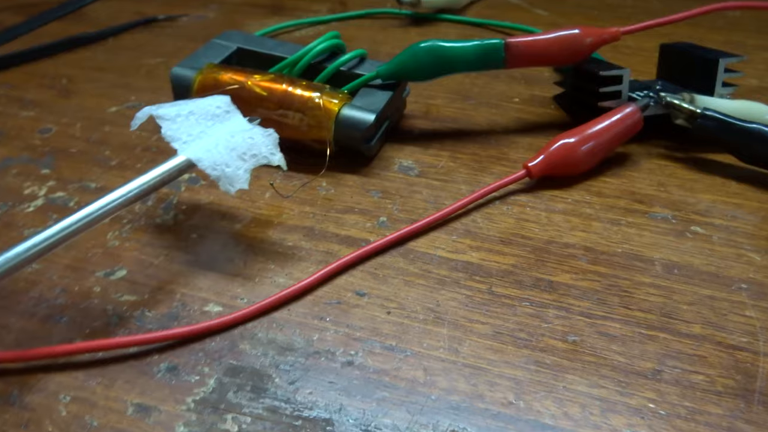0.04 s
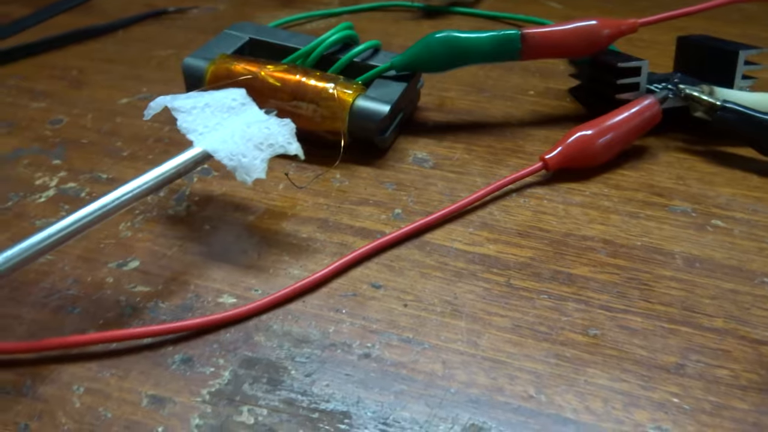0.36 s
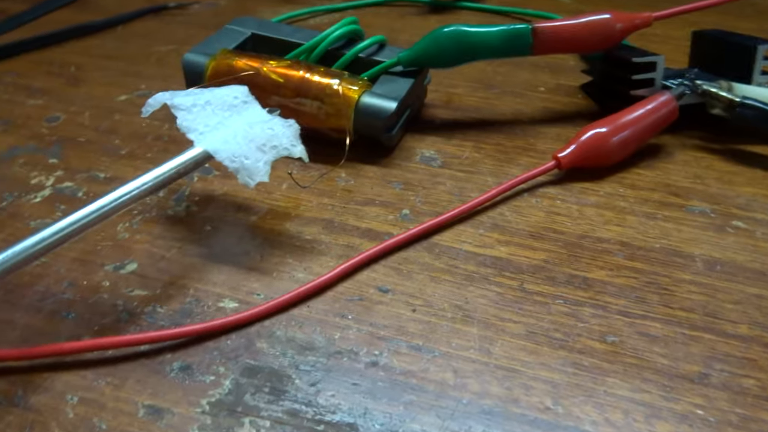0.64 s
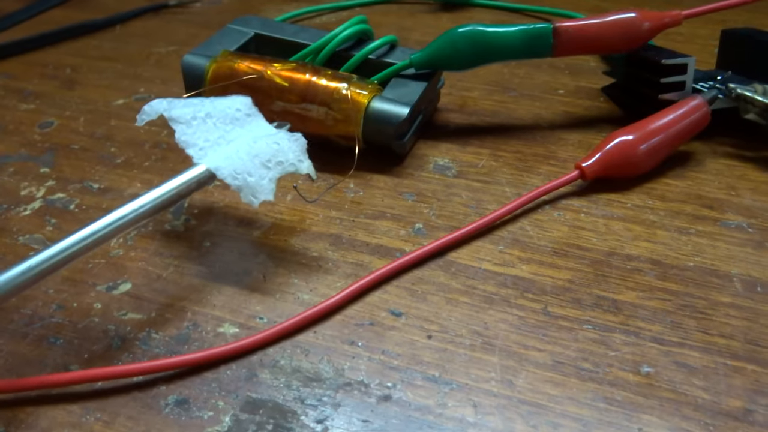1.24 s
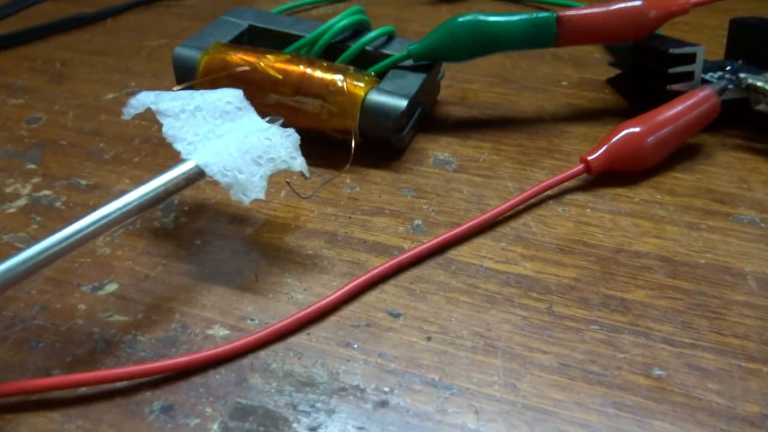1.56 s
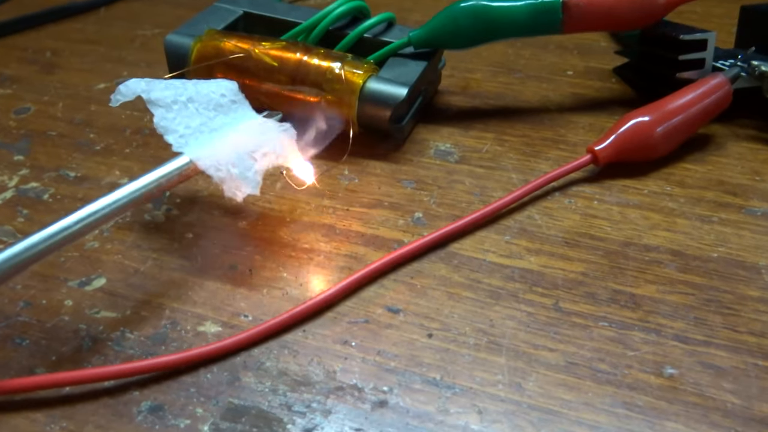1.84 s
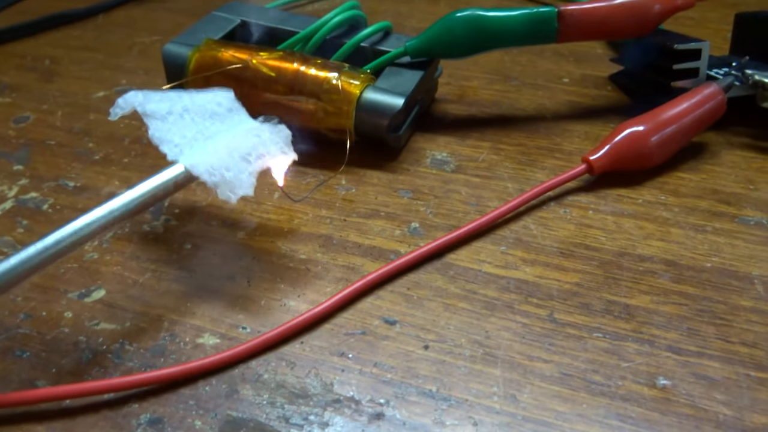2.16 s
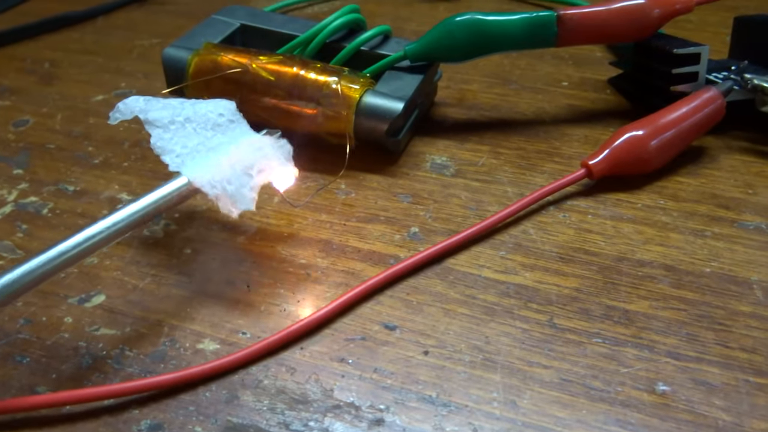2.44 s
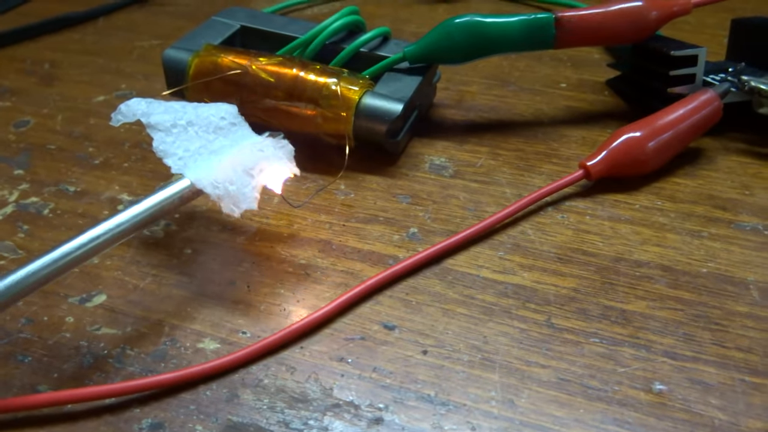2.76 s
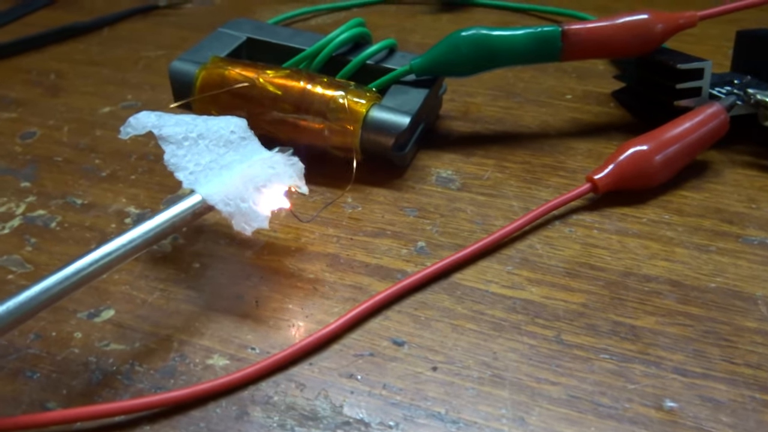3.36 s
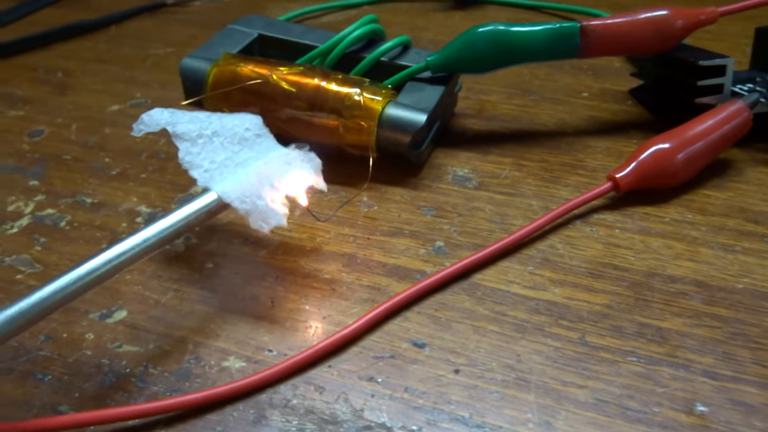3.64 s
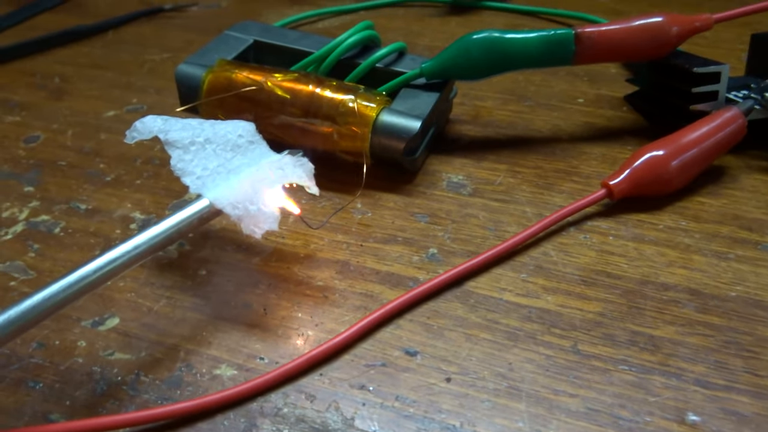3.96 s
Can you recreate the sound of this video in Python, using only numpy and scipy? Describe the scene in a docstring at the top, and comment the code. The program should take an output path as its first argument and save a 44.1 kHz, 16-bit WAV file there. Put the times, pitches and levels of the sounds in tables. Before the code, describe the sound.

A small high-voltage transformer whines steadily close to the microphone, ticking faintly over a room fan's hum. An electric arc strikes with a double crack, then hisses and sizzles in bursts on burning paper while the whine wavers.

```python
"""A small high-voltage transformer on a wooden table, close to the microphone, in a room with a fan.
At first the core whines over the fan's hum; its drive slips with a faint tick several times a second.
At 1.65 s an arc strikes with a double crack, loads the core and changes the whine.
From then on the arc hisses on a burning paper wad, and from 2.1 s it sizzles in bursts."""
import sys
import numpy as np
from scipy.fft import rfft, irfft, next_fast_len
from scipy.io import wavfile
from scipy.ndimage import map_coordinates

SR = 44100
rng = np.random.default_rng(int(sys.argv[2]) if len(sys.argv) > 2 else 0)


def wrap_up_sound(samples):
    """Save the sound to the file named by the first command line argument, as 16-bit audio."""
    columns = np.atleast_2d(samples).T
    # keep every value between -1 and 1, then stretch to whole-number steps
    tamed = np.clip(columns, -1, 1)
    steps = np.round(tamed * 32767).astype(np.int16)
    wavfile.write(sys.argv[1], SR, steps)


N = 176400
T = np.arange(N) / SR

DRIVE_HZ, SWITCHES, CORE_RESONANCE_HZ = 243.68, 4, 6700
SLIP_START_S, SLIP_EVERY_S, SLIP_LENGTH_S = 0.1873, 0.1303, 0.0023
SLIP_RAD, SLIP_SPREAD_RAD, SLIP_BAND_HZ, SLIP_WIDTH_HZ = 2.3, 0.19, 7590, 283
STRIKE_S, CHANGEOVER_S, WARM_UP_S = 1.652, 0.011, 0.65

# The core's whine, idle and feeding the arc. Each row: multiple of the drive rate, base level in dB.
IDLE_PARTIALS = [(8, -60), (12, -54), (16, -55), (20, -56), (24, -55), (25, -63), (27, -64), (28, -51.5),
                 (29, -54), (30, -51), (31, -42.5), (32, -38), (33, -48.5), (34, -58), (35, -59), (36, -42),
                 (37, -43), (39, -56), (40, -41.5), (41, -56), (42, -61), (43, -56), (44, -45), (45, -47.5),
                 (48, -57), (49, -58), (57, -65), (60, -66), (61, -64)]
LOADED_PARTIALS = [(11, -61), (13, -57), (15, -54.5), (16, -62), (17, -63), (19, -63), (20, -56.5),
                   (25, -56), (27, -62), (28, -59), (29, -63), (31, -49.5), (32, -49), (33, -50), (35, -60),
                   (36, -46.5), (37, -50), (39, -54), (40, -47), (41, -39.5), (42, -53), (43, -48.5),
                   (44, -44.5), (45, -44), (46, -57), (47, -60), (48, -52), (49, -49.5), (50, -62),
                   (51, -61), (53, -58), (55, -62), (56, -55.5), (60, -63), (61, -59), (64, -60)]
# Partials that settle as the circuit warms. Each row: multiple of the drive rate, starting offset in dB.
COLD_OFFSETS = [(20, 4), (29, 6), (30, 4), (31, -9), (33, -13), (36, -6), (37, -6), (39, 7), (44, -5),
                (45, -6)]
# The arc's load on the core. Each row: time in seconds, shift of the whine in dB.
ARC_LOAD = [(1.68, -4.5), (1.76, -6.5), (1.87, -4), (1.93, -1.5), (2.0, -1.5), (2.1, 2), (2.14, 0),
            (2.21, 6), (2.26, 2.5), (2.35, 1.5), (2.39, 0), (2.43, 2), (2.53, -5.5), (2.63, 1),
            (2.72, -1.5), (2.87, -1), (2.93, -7.5), (3.03, -5), (3.09, -2.5), (3.29, -3), (3.33, 1),
            (3.48, 1), (3.6, 4), (3.7, 2.5), (3.78, 5), (3.87, 3.5), (4.0, 6)]
# Multiples of the drive rate that barely follow the load, and those that whistle up together.
STIFF_MULTIPLES = (31, 33, 35, 37, 45)
WHISTLING_MULTIPLES = (20, 25, 28, 40, 48)
# The swell of that whistle. Each row: time in seconds, shift in dB.
WHISTLE_SWELL = [(1.8, -10), (1.95, 1), (2.1, 6), (2.22, 3), (2.52, -8), (2.65, 1.5), (2.75, -5), (3.1, -9),
                 (3.6, -0.5), (4.0, 1.5)]
# The arc's cracks and sizzling bursts. Each row: start in seconds, hold in seconds, level in dB.
ARC_CRACKS = [(1.6522, .006, -32.5), (1.669, 0.003, -33.5), (1.779, .005, -40.5)]
SIZZLE_BURSTS = [(2.119, .16, -41), (2.123, 0.03, -38.5), (2.526, 0.0072, -42), (2.553, .008, -42),
                 (2.591, 0.1, -39), (2.645, 0.026, -39), (2.787, 0.014, -47), (3.09, .006, -48),
                 (3.555, 0.03, -42.5), (3.81, .012, -46), (3.942, 0.012, -43)]
# The paper burning in the arc. Each row: time in seconds, hiss level in dB, flame level in dB.
BURN_LEVELS = [(1.66, -47, -50), (1.85, -45, -63), (2.03, -41.5, -57), (2.1, -43, -54), (2.19, -37, -51),
               (2.27, -37.5, -50), (2.32, -45.5, -55), (2.55, -48, -54), (2.655, -34.5, -49),
               (2.71, -43, -55), (3.0, -44, -52), (3.27, -47.5, -56), (3.38, -41.5, -45), (3.5, -44, -55.5),
               (3.6, -44, -53), (3.78, -49, -60), (3.93, -41.5, -44.5), (4.0, -49, -55)]
# Each noise as it reaches the microphone. Each row: frequency in Hz, relative density in dB.
CRACK_SPECTRUM = [(200, -5), (700, 0), (3000, 3.5), (5000, -8.5), (7000, 0.5), (11300, 3), (13000, -13)]
HISS_SPECTRUM = [(300, -14), (1500, -3.5), (3000, -1.5), (4500, -13.5), (6300, -16.5), (7800, -1.5),
                 (9000, 1.5), (10300, 6), (11500, 2), (13000, -11), (16000, -7)]
FLAME_SPECTRUM = [(60, -26), (200, 12.5), (450, 9), (750, 11), (1200, -8.5), (1800, -10), (4000, -34),
                  (10000, -46)]
SIZZLE_SPECTRUM = [(150, -10), (450, -4), (800, 1), (1600, -1.5), (2400, 4), (3300, 1), (4500, -10.5),
                   (6500, -4.5), (8800, -26), (10600, 8), (11600, 2), (13000, -19), (16000, -36)]
TICK_SPECTRUM = [(3000, -14), (7400, -10), (10500, -1), (13000, -24)]
AIR_SPECTRUM = [(25, -45), (60, -21), (160, -9.5), (220, -4), (280, -1.5), (340, -5.5), (430, -15),
                (700, -16.5), (900, -22.5), (1100, -16.5), (1700, -25), (2800, -24), (3700, -37),
                (12000, -27.5), (16000, -50)]
# Fan and mains hum in the room. Each row: frequency in Hz, level in dB.
HUM_TONES = [(49.5, -67.5), (120, -65), (130, -61.5), (270.5, -50), (294, -49), (391, -61.5), (915, -67.5),
             (1044, -60.5), (1174, -64.5), (1549, -65), (1707, -69)]
# Stereo width of the noises. Each row: frequency in Hz, side against mid in dB.
STEREO_WIDTH = [(50, -23), (270, -27.5), (600, -14), (1200, -9), (2000, -22.5), (6000, -58), (12000, -4)]
# Balance at the microphone. Each row: frequency in Hz, left minus right in dB.
STEREO_BALANCE = [(200, 0), (700, -1), (1500, -1.3), (2600, .2), (7000, -.6)]


def transformer():
    """Close up, the core settles into a steady whine, then follows the unsteady load of the arc."""
    cold = np.exp(-(T / WARM_UP_S) ** 2)
    load_db, = curves(ARC_LOAD)
    whistle_db, = curves(WHISTLE_SWELL)

    def cold_shift(k):
        return dict(COLD_OFFSETS).get(k, 0) * cold

    def load_shift(k):
        if k in WHISTLING_MULTIPLES:
            return whistle_db
        stiff = k in STIFF_MULTIPLES or k * DRIVE_HZ < CORE_RESONANCE_HZ
        return 0.18 * load_db if stiff else load_db

    idle = whine(IDLE_PARTIALS, cold_shift, weak_db=-71, drift_db=0.8, scatter_rad=1.15)
    loaded = whine(LOADED_PARTIALS, load_shift, weak_db=-67.5, drift_db=1.8, scatter_rad=1.68)
    flutter = amp(-1 + 0.7 * wobble(40))
    struck = np.clip((T - STRIKE_S) / CHANGEOVER_S, 0, 1)
    return (1 - struck) * idle + struck * flutter * loaded


def whine(partials, shift_db, weak_db, drift_db, scatter_rad):
    """The core sings at harmonics of the drive; each slip jumps their phases, most of all in one band."""
    count, since = np.divmod(T - SLIP_START_S + SLIP_EVERY_S, SLIP_EVERY_S)
    slips = count + np.clip(since / SLIP_LENGTH_S, 0, 1)
    ring, levels = ring_phases(partials), dict(partials)
    out = np.zeros((2, N))
    for k in range(min(levels), max(levels) + 1):
        hz = k * DRIVE_HZ
        scatter, lean = rng.standard_normal(2)
        jumps = SLIP_SPREAD_RAD * np.interp(slips, np.arange(40), rng.standard_normal(40))
        in_band = np.exp(-((hz - SLIP_BAND_HZ) / SLIP_WIDTH_HZ) ** 4)
        step = SLIP_RAD * in_band if k % SWITCHES else 0
        phase = 2 * np.pi * hz * T + ring[k] + scatter_rad * scatter + step * slips + jumps
        level = amp(levels.get(k, weak_db) + shift_db(k) + drift_db * wobble(9))
        side = amp(-18) * np.sign(lean) * np.sin(phase)
        out += np.sqrt(2) * level * (np.cos(phase) + np.outer([1, -1], side))
    return out


def ring_phases(partials):
    """A phase for each harmonic such that every cycle starts sharply and rings out (minimum phase)."""
    multiple, db = np.transpose(partials)
    levels = np.full(73, db.min())
    levels[np.round(multiple).astype(int)] = db
    cepstrum = irfft(np.log(amp(levels)))
    return 2 * rfft(cepstrum[:len(levels) - 1], len(cepstrum)).imag


def arc():
    """The arc cracks as it strikes and sputters, hisses and sizzles on the paper, and feeds a flame."""
    hiss_db, flame_db = curves(BURN_LEVELS)
    crack = discharges(ARC_CRACKS, release_s=0.0076) * noise(CRACK_SPECTRUM, amp(2.2 * wobble(900)))
    hiss = amp(hiss_db + 1.4 * wobble(45)) * noise(HISS_SPECTRUM, sparks(pulse_db=4.5, grain_db=1.5))
    flame = amp(flame_db + 2.0 * wobble(22.11)) * noise(FLAME_SPECTRUM)
    sizzle_level = discharges(SIZZLE_BURSTS, release_s=0.0099) * amp(0.8 * wobble(60))
    sizzle = sizzle_level * noise(SIZZLE_SPECTRUM, sparks(pulse_db=1.5, grain_db=-0.5))
    return crack + sizzle + (T > STRIKE_S) * (hiss + flame)


def discharges(rows, release_s, attack_s=0.0006):
    """Envelope of a run of discharges: each rises fast, holds and dies away."""
    power = np.zeros(N)
    for start, hold, db in rows:
        rise = np.clip((T - start) / attack_s, 0, 1)
        fall = np.exp(-np.maximum(T - start - hold, 0) / release_s)
        power += (amp(db) * rise * fall) ** 2
    return np.sqrt(power)


def sparks(pulse_db, grain_db):
    """The discharge swells once a drive cycle, with uneven strength."""
    return amp(pulse_db * np.sin(2 * np.pi * DRIVE_HZ * T) + grain_db * wobble(700))


def ticks(level_db=-39.5, decay_s=0.0032):
    """Each slip of the drive jolts the core: a faint, bright tick."""
    since = (T - SLIP_START_S) % SLIP_EVERY_S
    return amp(level_db) * np.exp(-since / decay_s) * noise(TICK_SPECTRUM)


def fan(air_db=-43.5, waver_db=2.5, waver_rad=0.56):
    """In the background, the cooling fan moves air over slightly wavering fan and mains tones."""
    hum = np.zeros(N)
    for hz, db in HUM_TONES:
        level = amp(db + waver_db * wobble(7.3))
        hum += level * np.sin(2 * np.pi * hz * T + waver_rad * wobble(9))
    return amp(air_db) * noise(AIR_SPECTRUM) + np.sqrt(2) * hum


def noise(spectrum, gate=1):
    """Stereo noise of rms 1, chopped by the gate before it is coloured."""
    def colour(hz):
        mid_db = along(spectrum, hz)
        return amp([mid_db, mid_db + along(STEREO_WIDTH, hz)])

    mid, side = filtered(rng.standard_normal((2, N)) * gate, colour)
    stereo = np.array([mid + side, mid - side])
    return stereo / np.sqrt(np.mean(stereo ** 2) + 1e-20)


def amp(db):
    """Decibels to gain."""
    return 10 ** (np.asarray(db) / 20)


def along(points, hz):
    """Read (Hz, value) points on a log axis."""
    freqs, values = np.transpose(points)
    return np.interp(np.log(hz + 1), np.log(freqs + 1), values)


def curves(rows):
    """One value per sample for each column after the time."""
    times, *columns = np.transpose(rows)
    return [np.interp(T, times, column) for column in columns]


def wobble(rate):
    """A smooth random curve, rate knots a second."""
    coarse = T[::32]
    knots = rng.standard_normal(4096)
    return np.interp(T, coarse, map_coordinates(knots, [coarse * rate], mode='wrap'))


def filtered(x, response):
    """Filter x by a gain given as a function of frequency."""
    size = next_fast_len(N + SR // 2)
    return irfft(rfft(x, size) * response(np.fft.rfftfreq(size, 1 / SR)), size)[..., :N]


def scene():
    """All sources meet at the microphone, a little to the right of centre."""
    mix = transformer() + ticks() + arc() + fan()
    return filtered(mix, lambda hz: amp(np.outer([0.5, -0.5], along(STEREO_BALANCE, hz))))


def record(dry):
    """The recorder fades in and keeps nothing above its band limit."""
    start_s, knee_s, rise_s, top_hz = 0.047, 0.003, 0.097, 15800
    since = knee_s * np.logaddexp(0, (T - start_s) / knee_s)
    fade = 1 - np.exp(-since / rise_s)
    return filtered(dry * fade, lambda hz: hz < top_hz)


dry = scene()
out = record(dry)
wrap_up_sound(out)
```